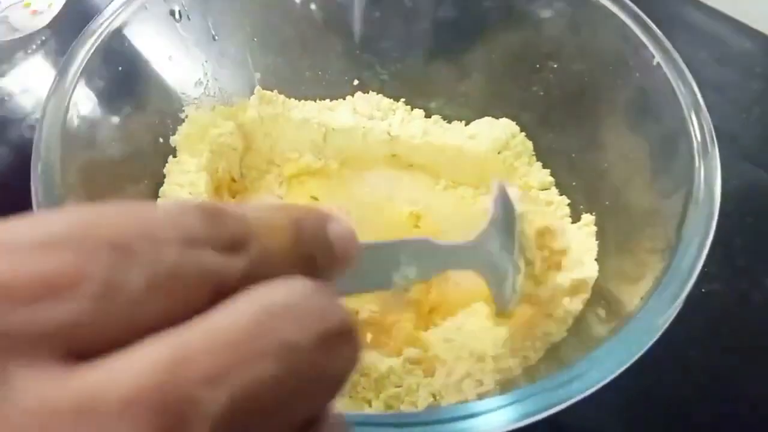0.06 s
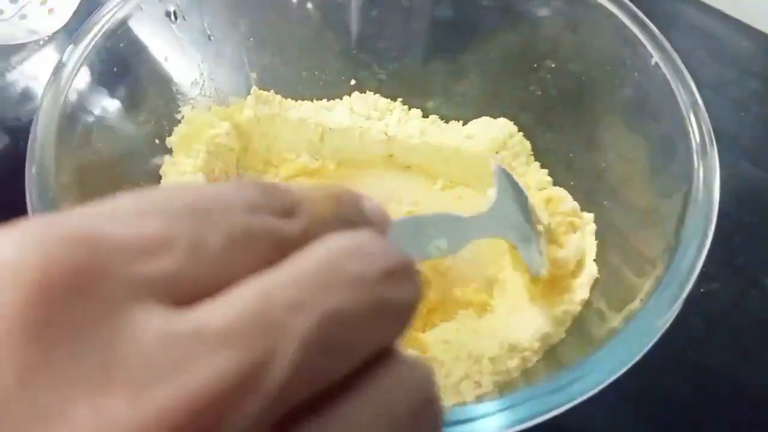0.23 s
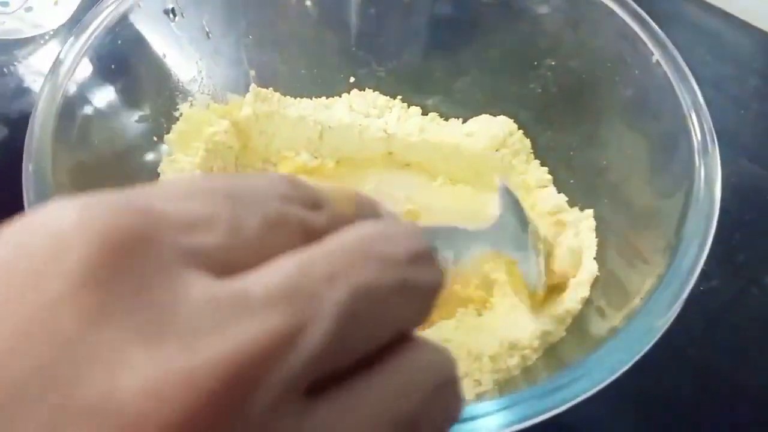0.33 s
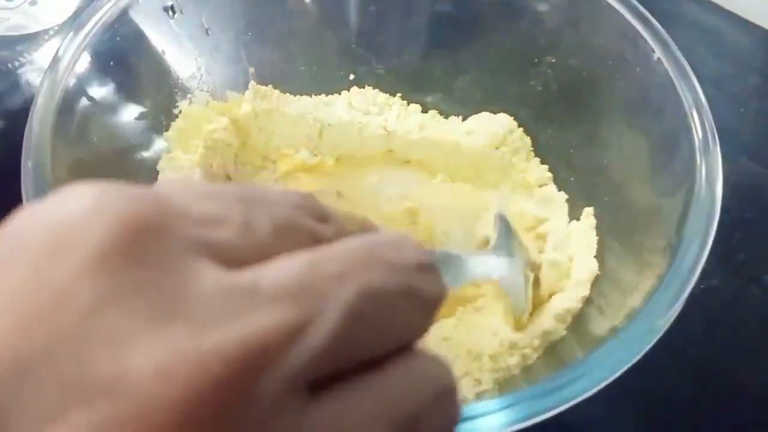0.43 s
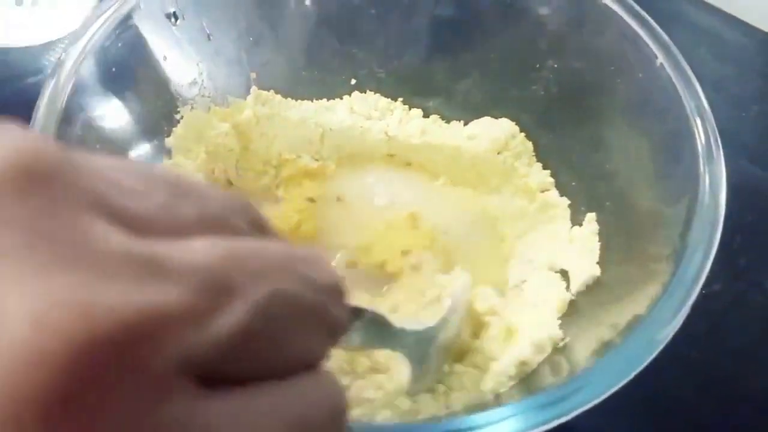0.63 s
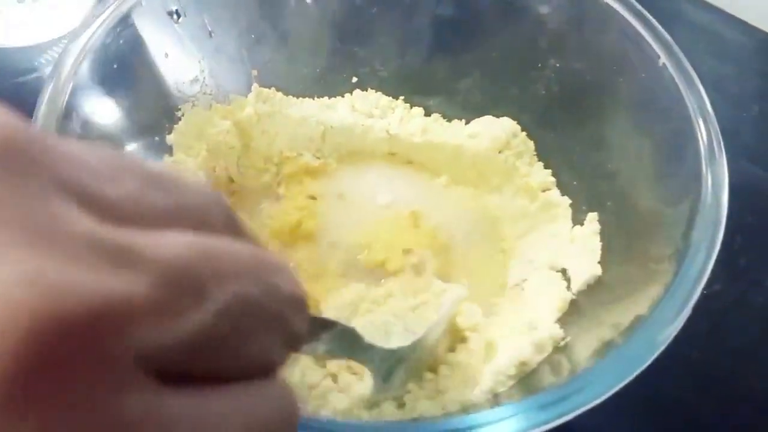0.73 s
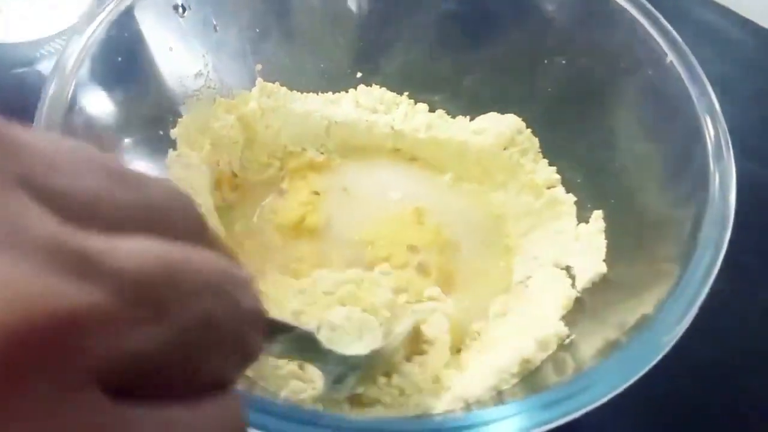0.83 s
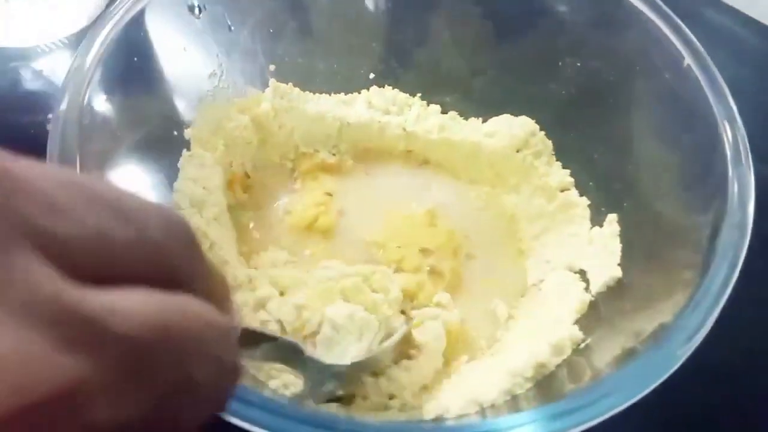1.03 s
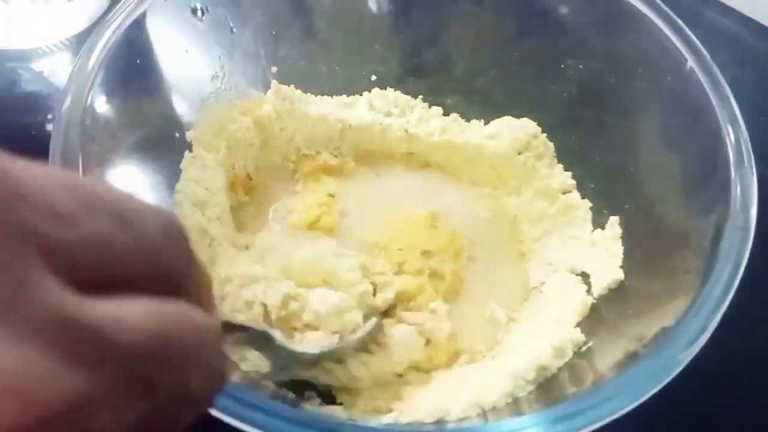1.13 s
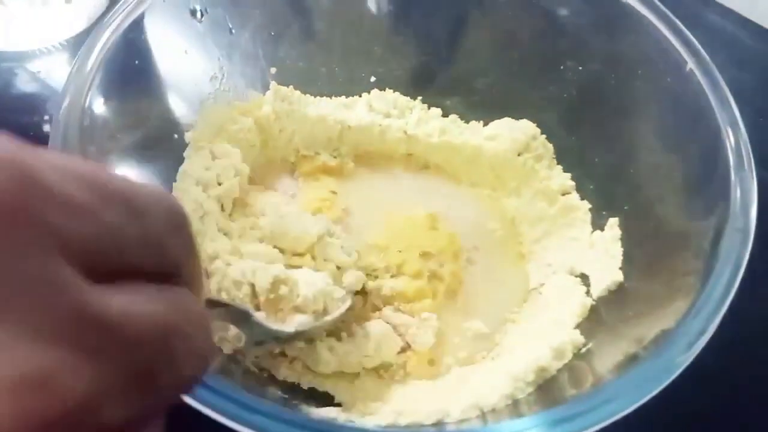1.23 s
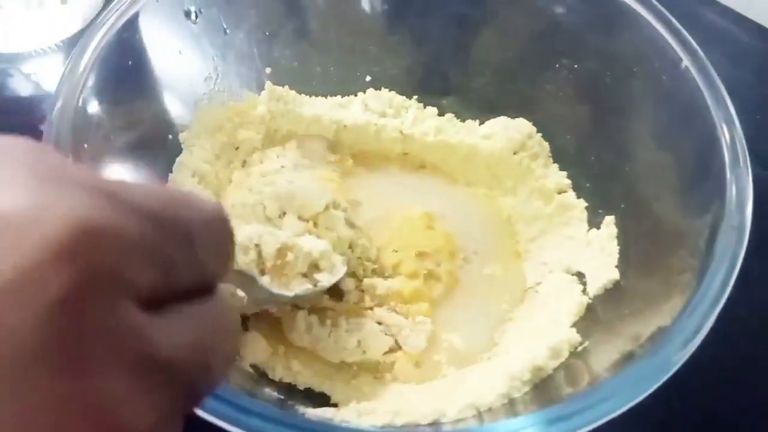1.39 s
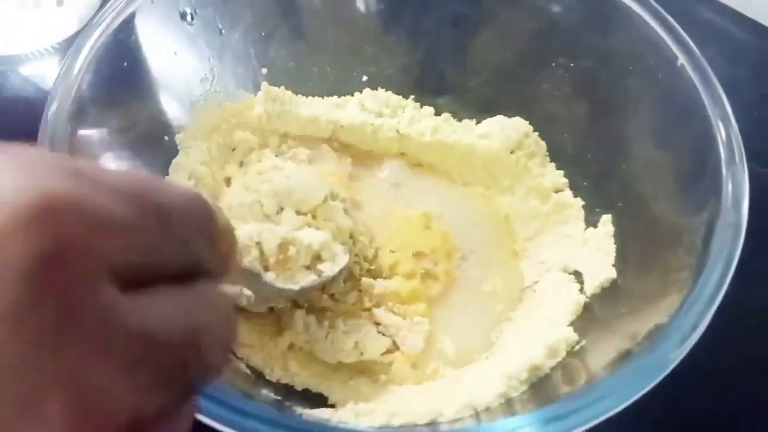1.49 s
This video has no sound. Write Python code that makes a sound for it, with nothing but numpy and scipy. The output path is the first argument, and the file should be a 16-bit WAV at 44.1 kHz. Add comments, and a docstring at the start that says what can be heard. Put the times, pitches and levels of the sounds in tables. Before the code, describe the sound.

A metal spoon clinks against a glass bowl several times in quick succession, scrapes softly through flour, then knocks again. The microphone is close, in a kitchen with light hiss, while a faint engine outside drones and fades.

```python
"""An engine's low drone and a soft scraping come first, over the hiss of a kitchen.
Then, on the counter close to a phone's two microphone ports, a metal spoon knocks a glass bowl
of flour a few times: glass and spoon ring until the flour smothers the spoon. In between, the spoon
scrapes through the grains and makes the glass sing briefly. Outside, the engine passes and fades."""
import sys
import numpy as np
from scipy import signal
from scipy.fft import rfft, irfft, next_fast_len
from scipy.io import wavfile

SR = 44100
rng = np.random.default_rng(int(sys.argv[2]) if len(sys.argv) > 2 else 0)


def pcm_store(signal):
    """Save signal as 16-bit PCM."""
    levels = np.round(np.clip(np.atleast_2d(signal), -1, 1) * 32767)
    wavfile.write(sys.argv[1], SR, levels.astype(np.int16).T)


N = 68355
T = np.arange(N) / SR


def amp(db):
    """Decibels to amplitude."""
    return 10 ** (np.asarray(db) / 20)


def unit(x):
    """Scale to rms 1."""
    return x / np.sqrt(np.mean(x ** 2) + 1e-20)


def along(points, hz):
    """Read (frequency, value) points on a log axis."""
    f, values = np.transpose(points)
    return np.interp(np.log(hz + 1), np.log(f + 1), values)


def curve(points, outside=None):
    """Read (time, value) points at every sample."""
    times, values = np.transpose(points)
    return np.interp(T, times, values, outside, outside)


def filtered(x, response):
    """Apply a complex frequency response."""
    size = next_fast_len(x.shape[-1] + 8192)
    return irfft(rfft(x, size) * response(np.fft.rfftfreq(size, 1 / SR)), size)[..., :x.shape[-1]]


def wobble(hz, count=1):
    """Smooth random curves of rms 1."""
    return unit(filtered(rng.standard_normal((count, N)), lambda f: np.exp(-(f / hz) ** 2)))


# How alike the two ports hear a noise: (frequency [Hz], correlation [0-1])
PORT_LIKENESS = [(30, 0.34), (80, 1), (200, 0.93), (500, 0.67), (1500, 0.04), (8000, 0.017)]
def stereo_noise(spectrum, likeness=PORT_LIKENESS, source=None):
    """Coloured noise of rms 1, partly shared between the ports."""
    def colour(hz):
        angle = np.arccos(np.clip(along(likeness, hz), -1, 1)) / 2
        return amp(along(spectrum, hz)) * [np.cos(angle), np.sin(angle)]
    mid, side = filtered(rng.standard_normal((2, N)) if source is None else source, colour)
    return unit(np.array([mid + side, mid - side]))


# Room tone, all around the phone: (frequency [Hz], relative density [dB])
HISS_SPECTRUM = [(20, -13), (100, -1.5), (300, -10.5), (700, -8.5), (1200, -5.5), (1700, -10), (2400, -7),
                 (3200, -16.5), (4500, -24.5), (5300, -27.5), (6500, -20), (7400, -26.5), (8000, -44),
                 (15500, -55)]
def room_hiss(level_db=-61):
    """The steady hiss of the kitchen."""
    return amp(level_db) * stereo_noise(HISS_SPECTRUM)


# The engine outside, heard from the counter: (time [s], gain [dB])
ENGINE_PASS = [(0, -59), (.04, -50.5), (.2, -51), (.35, -48.5), (.5, -50.5), (.7, -52), (.9, -53),
               (1.0, -58), (1.09, -66.5), (1.14, -58.5), (1.19, -65.5), (1.35, -65), (1.55, -67.5)]
# Its harmonics: (multiple of the firing rate, relative level [dB])
ENGINE_ORDERS = [(2, -16.5), (3, 2), (4, -2), (5, -9.5), (6, -21), (7, -15), (8, -24)]
# Lift of the multiples above the fifth: (time [s], gain [dB])
UPPER_LIFT = [(0, -20), (.3, -5.5), (.8, 8.5), (.9, -10), (1.55, -4)]
# Its rumble: (frequency [Hz], relative density [dB])
RUMBLE_SPECTRUM = [(30, -47), (55, -16.5), (90, -8.5), (130, 1), (200, -6.5), (300, -17.5), (450, -19.5),
                   (900, -73.5)]
def engine(firing_hz=42.52, waver_hz=5.6, waver_rad=0.22, flutter_db=2.5, rumble_db=0.5):
    """Multiples of a wavering firing rate, each fluttering in level, over a rumble."""
    order, db = np.transpose(ENGINE_ORDERS)[:, :, None]
    phase = 2 * np.pi * firing_hz * T + waver_rad * wobble(waver_hz)
    flutter = flutter_db * wobble(2 * waver_hz, count=len(order))
    level = amp(db + (order > 5) * curve(UPPER_LIFT) + flutter)
    drone = (level * np.sin(order * phase + 2 * np.pi * rng.random(order.shape))).sum(0)
    return amp(curve(ENGINE_PASS)) * (drone + amp(rumble_db) * stereo_noise(RUMBLE_SPECTRUM))


# The kitchen's reverberation at the counter: (frequency [Hz], t60 [s])
KITCHEN_DECAY = [(150, 0.85), (330, 0.36), (600, 0.44), (1300, 0.36), (2500, 0.43), (6000, 0.36),
                 (12000, 0.15)]
def kitchen_reverb(x, delay_samples=300):
    """The room answers, each frequency dying at its own speed; the bass is alike at both ports."""
    hz, t, bins = signal.stft(rng.standard_normal((2, SR // 2)), SR, nperseg=256)
    tail = signal.istft(bins * amp(-60 * t / along(KITCHEN_DECAY, hz)[:, None]), SR, nperseg=256)[1]
    tail = stereo_noise([(20, -12), (200, -3.0), (3000, -1.5), (15000, -7)], source=tail)
    delayed = np.pad(x, ((0, 0), (delay_samples, 0)))
    return signal.fftconvolve(delayed, tail / np.linalg.norm(tail[0]), axes=1)[:, :N]


# Sliding flour, faint even this close: (time [s], level [dB])
SIFT_LEVEL = [(.44, -76), (.5, -70), (.57, -75)]
# Its hiss: (frequency [Hz], relative density [dB])
SIFT_SPECTRUM = [(3500, -30.5), (5500, -1), (7500, -2), (9000, -24), (10500, -62.5)]
def sifting_flour():
    """A little flour hisses off the spoon."""
    return amp(curve(SIFT_LEVEL, outside=-140)) * stereo_noise(SIFT_SPECTRUM)


# Stirring inside the bowl, close up: (time [s], level [dB])
SCRAPE_LEVEL = [(0, -64.5), (.2, -63), (.42, -55.5), (.55, -52), (.7, -58), (.85, -58.5), (1.0, -62.5),
                (1.08, -88), (1.3, -69.5), (1.55, -74)]
# Resonances under the spoon: (frequency [Hz], width [Hz], relative level [dB])
SCRAPE_RESONANCES = [(662, 41, 5), (933, 61, 4.5), (1370, 31, 4), (2050, 130, -1), (2420, 110, -2),
                     (2730, 241, -5), (3374, 37, -6.5)]
def scrape(grains_per_s=900, spread_db=3.5, top_hz=4570):
    """Grains of flour under the spoon excite the bowl's resonances."""
    def bowl(f):
        peaks = sum((-1) ** k * amp(db) * 1j * f * width / (hz * hz - f * f + 1j * f * width)
                    for k, (hz, width, db) in enumerate(SCRAPE_RESONANCES))
        return peaks / (1 + (f / top_hz) ** 4)
    grains = (rng.random((2, N)) < grains_per_s / SR) * amp(spread_db * rng.standard_normal((2, N)))
    return amp(curve(SCRAPE_LEVEL)) * unit(filtered(grains - grains.mean(), bowl))


# Glass tones, close up: (time [s], length [s], pitch [Hz], level [dB], left port's lead [rad])
GLASS_TONES = [(0.307, 0.042, 1350, -21.5, -1.45), (0.347, 0.051, 1346, -26, -1.22),
               (0.492, 0.049, 2052, -57.5, 0.62), (0.517, 0.17, 963, -56, 0.53),
               (0.726, 0.067, 962.4, -60.5, 0.024), (0.941, 0.11, 1310, -61.5, -0.99),
               (1.217, 0.053, 678, -44, 0.38)]
def singing_glass(squareness=4, waver_rad=.3, waver_hz=25):
    """The glass sings under the sliding spoon: short, slightly unsteady tones that swell and stop."""
    out = np.zeros((2, N))
    for start, length, hz, db, lead in GLASS_TONES:
        swell = np.sin(np.pi * np.clip((T - start) / length, 0, 1)) ** 2
        envelope = amp(db) * (1 - np.exp(-squareness * swell))
        phase = 2 * np.pi * hz * (T - start) + waver_rad * wobble(waver_hz)
        out += envelope * np.sin(phase + np.array([[lead], [-lead]]) / 2)
    return out


# The body of a knock: (frequency [Hz], relative density [dB])
THUD_SPECTRUM = [(70, -43), (130, -9), (670, -1), (1150, 3.5), (1600, -10), (2500, -19), (4800, -43),
                 (5900, -18.5), (9000, -55), (15000, -68)]
def thud(t, db, t60=.07):
    """A dull, fast-dying burst of noise."""
    return stereo_noise(THUD_SPECTRUM)[:, :len(t)] * amp(db - 60 * t / t60)


# The bright edge of a knock: (frequency [Hz], relative density [dB])
TICK_SPECTRUM = [(1000, -30), (3000, 3.5), (7500, -4), (9500, -18), (15500, -24.5)]
def tick(t, db, t60=0.027, lead_samples=11):
    """A brief, bright burst of noise that reaches the left port first."""
    left, right = stereo_noise(TICK_SPECTRUM, likeness=[(1000, .85)])
    return np.array([left, np.roll(right, lead_samples)])[:, :len(t)] * amp(db - 60 * t / t60)


def click(t, db, hz, half_width_cycles, left_lag_s=0.00024):
    """The pulse of contact, which reaches the right port first."""
    cycles = (t - [[left_lag_s], [0]]) * hz - 1 / 4
    return amp(db) * np.exp(-(cycles / half_width_cycles) ** 2) * np.cos(2 * np.pi * cycles)


def ring(t, modes, place, stretch, scatter_db=3):
    """Damped modes, weighted by the place struck, each with its own balance and phase at the ports."""
    hz, right_db, left_db, t60, pan_db, lead = np.transpose(modes)[:, :, None]
    db = right_db + place * (left_db - right_db) + scatter_db * rng.standard_normal(hz.shape)
    fade = amp(db - 60 * t / (t60 * stretch))
    phase = 2 * np.pi * hz * t
    return np.array([(fade * amp(side * pan_db / 2) * np.sin(phase + side * lead / 2)).sum(0)
                     for side in (1, -1)])


# Modes of the glass bowl, close up: (frequency [Hz], gain struck right [dB], gain struck left [dB],
# t60 [s], left port over right [dB], left port's lead [rad])
BOWL_MODES = [(187.3, -8.5, -18, 0.47, 1, -0.08), (328.4, -4.5, -6, 0.26, -7.5, -1.5),
              (385, -9.5, -16.5, 0.3, -8.5, -1.4), (520, -9.5, -1, 0.11, 3.5, -0.07),
              (579, -11.5, -12.5, 0.49, -2, 1), (614.4, -12, -5.5, 0.23, 7.5, -0.9),
              (679.3, 0, -40, 0.11, -2, 0.2), (694, -35, 6.5, 0.16, 0, -0.75),
              (823, -26, -19, 0.49, -6.5, -2.5), (879, -26, -4, 0.12, -1.5, -4),
              (1035, -24, -3.5, 0.21, -8, -1.8), (1113.8, 6, -17, 0.1, -5.5, -1.48),
              (1164, -19.5, 5.5, 0.25, 0.5, -1.7), (1227, -29.5, 1, 0.041, -9.5, -0.5),
              (1455.7, -5.5, -39, 0.28, 3.5, -3), (1354, -18, -35, 0.54, 4, -0.2),
              (1504, -44, -1.5, 0.2, -4, -4), (1638, -32.5, -8.5, 0.11, -5, -1.3)]
# Modes of the metal spoon: same columns
SPOON_MODES = [(1848, -29, -33.5, 0.11, 2.5, 0.24), (2716, -28, -19.5, 0.22, 2, 3.5),
               (2520, -27, -22, .27, 3, 1.4), (3236, -34.5, -42, 0.31, -1.5, 1.8),
               (4458, -36.5, -39, 0.4, 0.5, 2.5), (5900, -31.5, -38.5, 0.46, -2, 4),
               (5950, -26, -26.5, 0.28, 1.5, 3.5), (5610, -45, -31, .25, -0.5, 3),
               (6390, -44, -21, .08, 1.5, 3), (3850, -30, -34, 0.16, 0.5, -1),
               (4100, -31.5, -34, 0.18, 3, 1), (4880, -50.5, -46, 0.27, 0, -1),
               (6793, -33, -44, .08, 1, 1.5), (8220, -44.5, -44, .15, 5.5, 1.4),
               (9360, -51.5, -61, .2, 4.5, 2.5), (10000, -49, -48, 0.069, 5.5, 2),
               (11500, -53.5, -46, .1, 3, 1.5), (15250, -53.5, -73, .06, 5.5, 0.5)]
# Spoon on glass, close to the phone: (time [s], overall gain [dB], place [0 right wall - 1 left wall],
# bowl t60 [factor], spoon [dB], thud [dB], click [dB], click pitch [Hz], click half-width [cycles],
# tick [dB], rise [ms], spoon t60 [factor], time until flour smothers the spoon [s])
SPOON_KNOCKS = [(0.2366, -17, 0, 0.78, 3, -2.5, 8.5, 763, 0.68, -25, 0.17, 1.03, 0.16),
                (0.3115, -29, 0.57, 1.12, -8.5, -7.5, 14.5, 607, 0.41, -45, 0.59, 0.94, .12),
                (.339, -33.5, 0.43, 1.51, -17.5, -7, 16.5, 508, 0.41, -52.5, 0.87, 1.1, .09),
                (0.361, -32, .2, 0.27, -27, -16.5, 6, 500, 1.5, -57, 2.5, 1.1, .07),
                (1.2217, -76.5, 0.71, 0.4, 4, 1.5, 36, 1500, 3.5, 18, 0.3, 0.46, .05),
                (1.2703, -26.5, 0.92, 0.59, 2.5, 3.5, -26.5, 1200, 0.73, -34, 1.42, 0.58, 0.072)]
def knocks(smother_s=.012, low_cut_hz=128):
    """Each knock clicks, ticks, thuds and rings bowl and spoon; the bowl is too small to radiate bass."""
    early = SR // 50  # the click begins ahead of its peak
    out, t = np.zeros((2, N + SR)), (np.arange(SR // 2) - early) / SR
    for (start, db, place, bowl_stretch, spoon_db, thud_db, click_db, click_hz, click_cycles,
         tick_db, rise_ms, spoon_stretch, free_s) in SPOON_KNOCKS:
        bowl = ring(t, BOWL_MODES, place, bowl_stretch)
        smother = np.exp(-np.maximum(t - free_s, 0) / smother_s)
        spoon = amp(spoon_db) * smother * ring(t, SPOON_MODES, place, spoon_stretch)
        rise = 1 - np.exp(-np.maximum(t, 0) * 1000 / rise_ms)
        body = rise * (bowl + spoon + thud(t, thud_db) + tick(t, tick_db))
        knock = body + click(t, click_db, click_hz, click_cycles)
        out[:, round(start * SR) - early:][:, :len(t)] += amp(db) * knock
    return filtered(out[:, :N], lambda f: f ** 2 / (f ** 2 + low_cut_hz ** 2))


def scene(reverb_db=-8, singing_send_db=-6):
    """All that reaches the counter; the knocks and the singing glass also sound in the room."""
    blows, tones = knocks(), singing_glass()
    reverb = amp(reverb_db) * kitchen_reverb(blows + amp(singing_send_db) * tones)
    return blows + tones + reverb + engine() + scrape() + sifting_flour() + room_hiss()


def record(dry, top_hz=15600):
    """The phone keeps nothing above its band limit."""
    return filtered(dry, lambda hz: hz < top_hz)


dry = scene()
out = record(dry)
pcm_store(out)
```